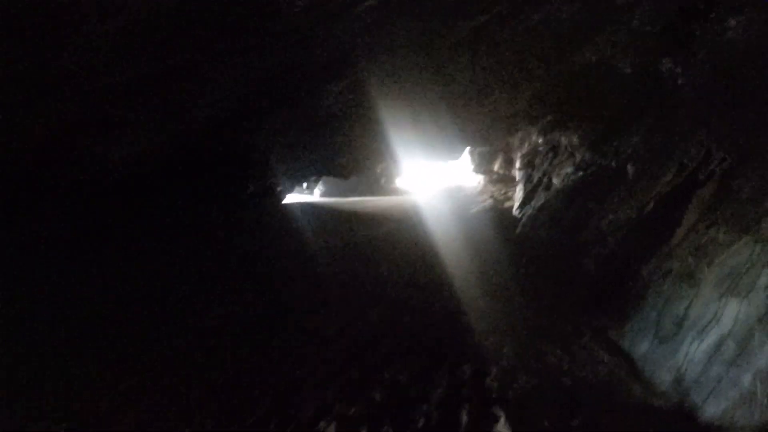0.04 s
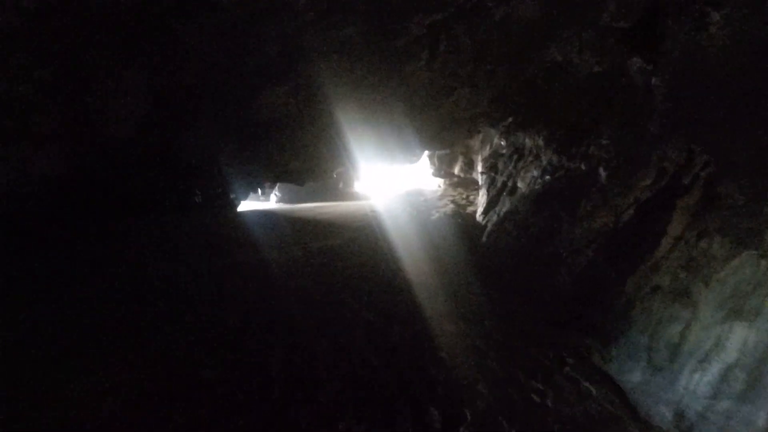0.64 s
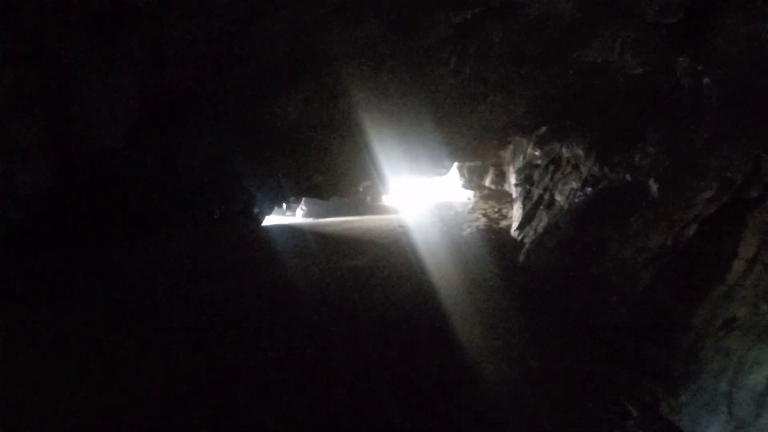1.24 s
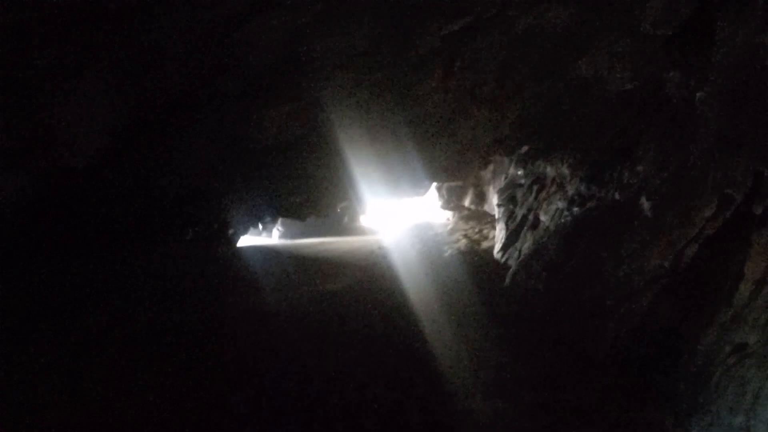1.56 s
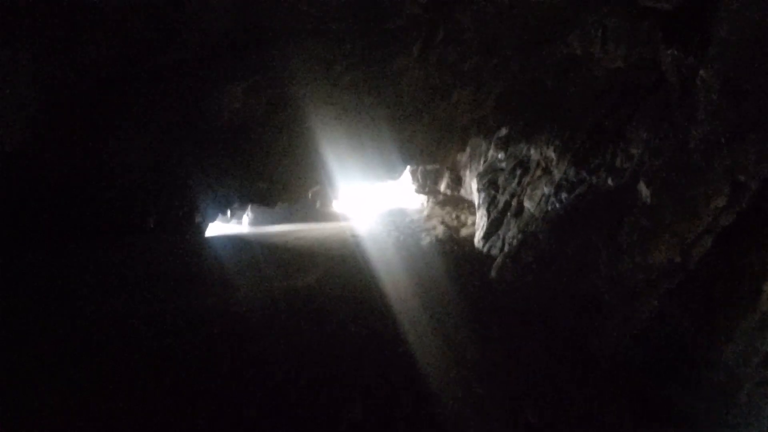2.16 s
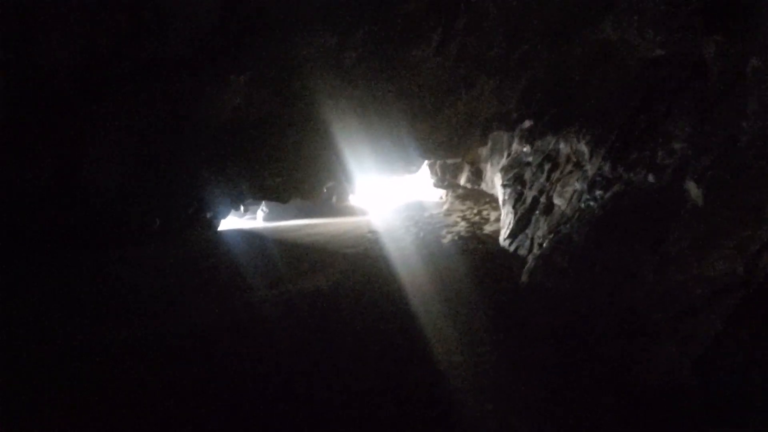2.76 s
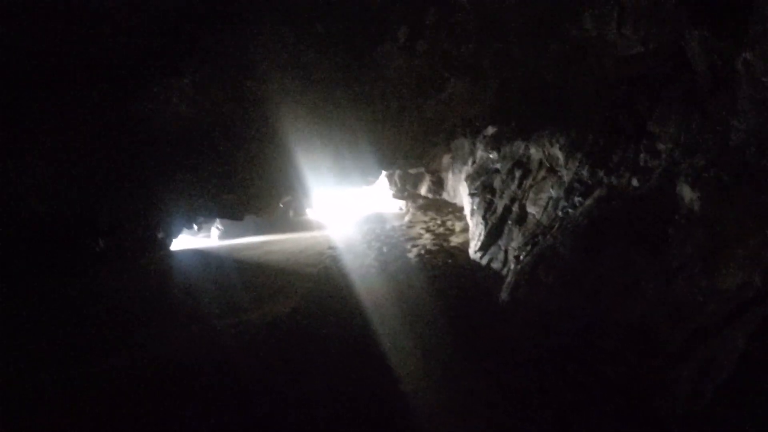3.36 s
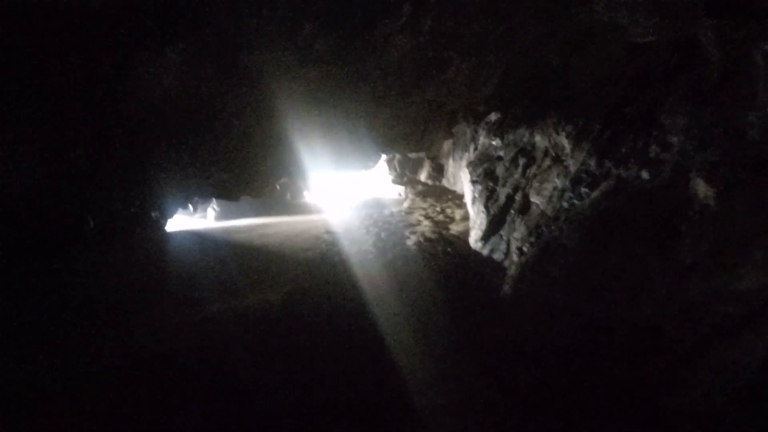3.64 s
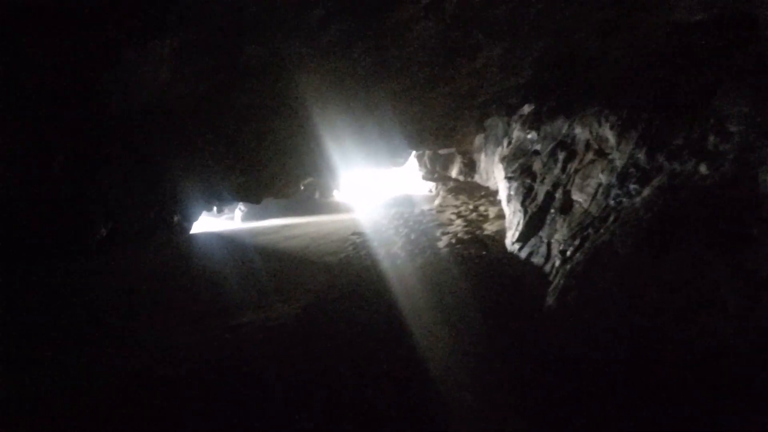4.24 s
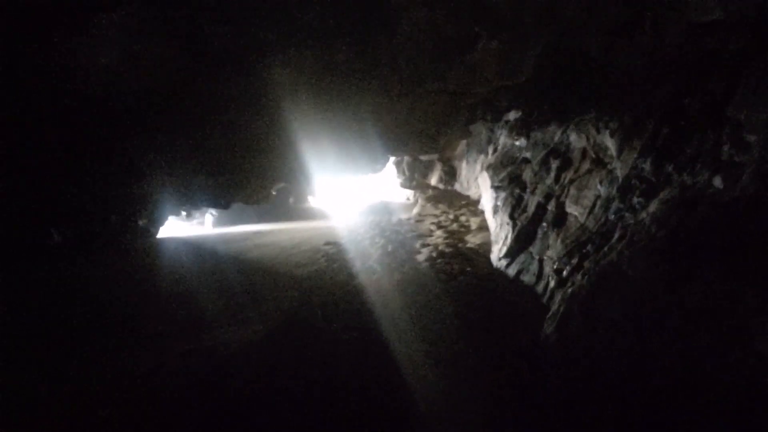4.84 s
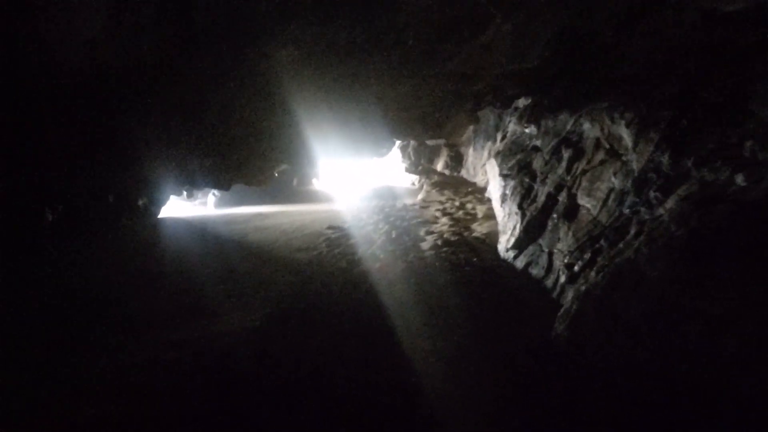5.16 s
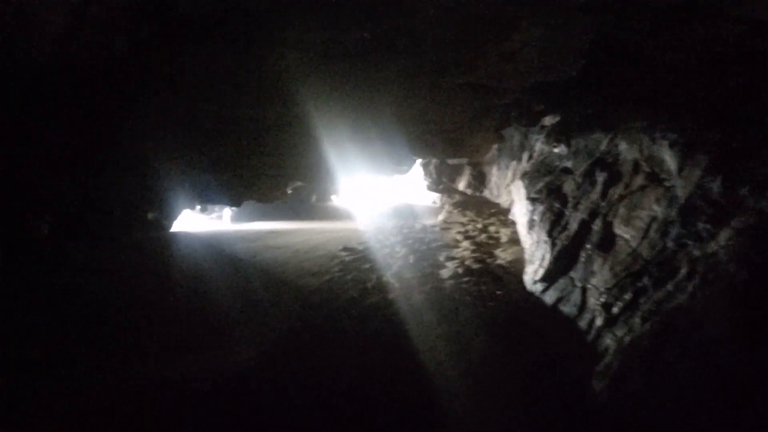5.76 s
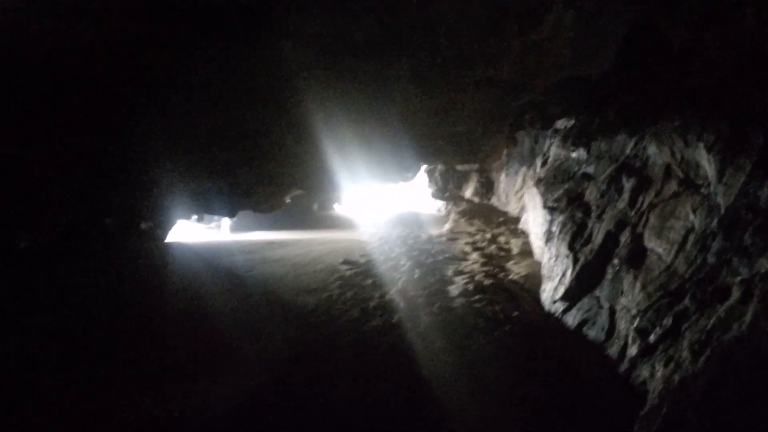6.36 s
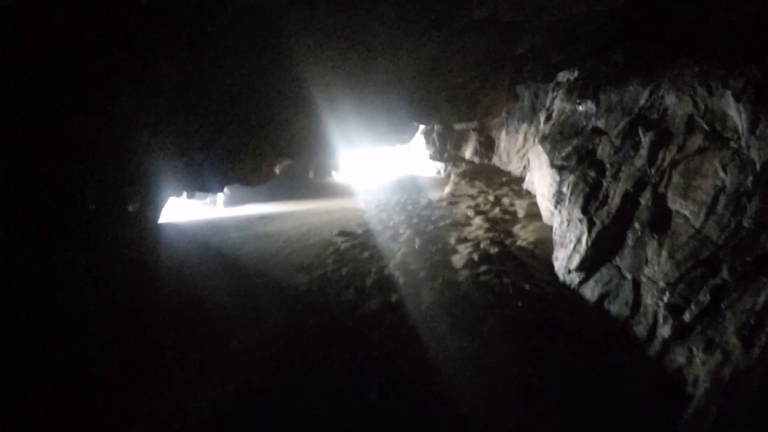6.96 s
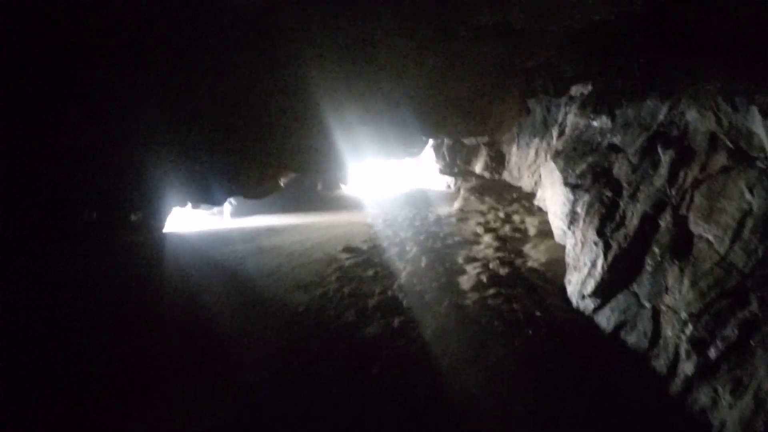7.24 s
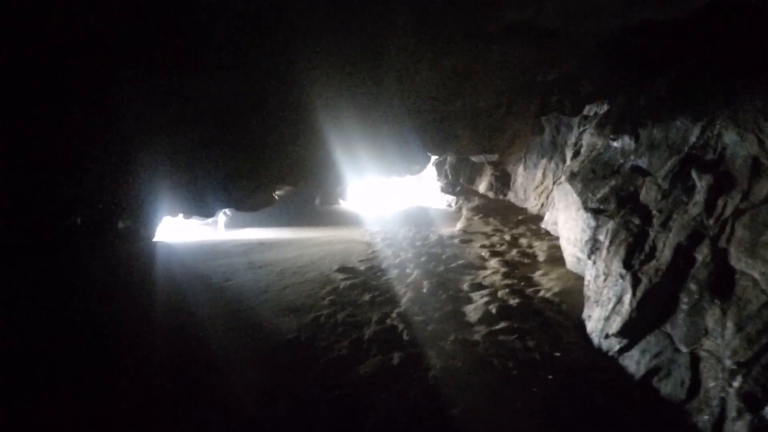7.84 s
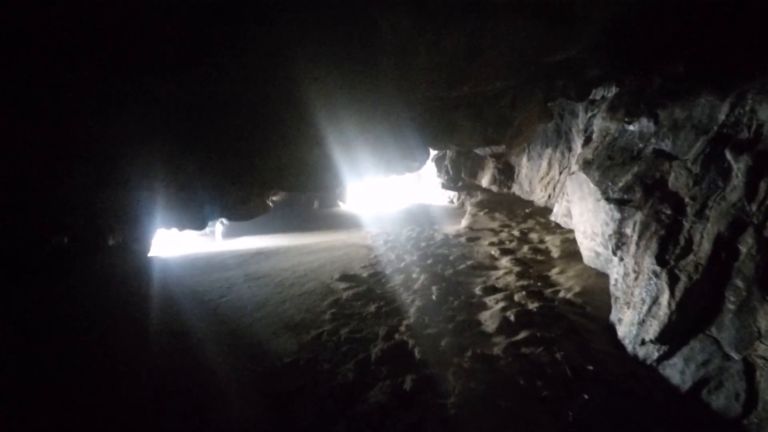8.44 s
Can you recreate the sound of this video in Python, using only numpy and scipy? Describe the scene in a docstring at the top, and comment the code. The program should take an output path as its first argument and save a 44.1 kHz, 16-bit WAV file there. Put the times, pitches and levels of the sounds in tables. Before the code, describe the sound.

Distant surf fills a rock cave throughout, a deep rumble under a steady, dull hiss. A very low boom rings from the outset and fades over the first few seconds. Right at the start, one dry tick of grit snaps close by with a short echo. The rumble heaves up by 0.5 seconds and holds. Breakers swell and die away with low booms at about 1.2 seconds and, strongest, at 2.6 seconds, then more weakly at 4.4 and 5.8 seconds. The bass drops back between 4.3 and 4.8 seconds, and the roar slowly ebbs until the end, near 8.7 seconds. Nearby, soft footsteps scrape faintly over sand during the first two seconds, with brief faint scuffs around 2.3, 3.1, 3.5, 5.4, 6 and 7.8 seconds. Two tiny high drips ping almost together at about 4.9 seconds. The steps and drips echo lightly off the walls.

```python
"""Distant surf in a rock cave.

A long set of waves rumbles in through the mouth, booms in two low modes of the cave and ebbs.
The rock smears its wash into a steady hiss. Close by, someone steps softly over sand,
with a few faint scuffs, one dry tick of grit and two tiny drips."""
import sys
import numpy as np
from scipy import signal
from scipy.fft import rfft, irfft
from scipy.io import wavfile

SR = 44100
rng = np.random.default_rng(int(sys.argv[2]) if len(sys.argv) > 2 else 0)


def generate_wav(sig):
    """Save sig (samples, or channels by samples) to the path in sys.argv[1] as 16-bit PCM at SR."""
    pcm = np.round(np.clip(np.atleast_2d(sig).T, -1, 1) * 32767).astype(np.int16)
    wavfile.write(sys.argv[1], SR, pcm)


N = 375291
TIME = np.arange(N) / SR
FREQS = np.maximum(np.arange(N // 2 + 1) * SR / N, 1)


# EQ curve of the surf's low end: f/Hz, level/dB
RUMBLE_EQ = [(8, -17), (16, -3), (28, 2), (48, -1), (75, -3), (100, -7.5), (140, -22), (400, -69),
             (2000, -100)]

def surf_rumble(start_s=.05, attack_s=.47, end_s=4.32, release_s=.45, set_db=-33.5, calm_db=-40.5):
    """The bass heaves up, holds while the set of waves lasts and drops back to the calm sea."""
    attack = (TIME - start_s) / attack_s
    release = 1 - (TIME - end_s) / release_s
    envelope = np.clip(np.minimum(attack, release), 0, 1)
    return churn(RUMBLE_EQ, rate_hz=7.3, depth_db=1.1) * undb(calm_db + (set_db - calm_db) * envelope)


# Heavy breakers at their peaks: t/s, level/dB
BREAKER_HITS = [(1.24, -37), (2.58, -33), (4.35, -39.5), (5.75, -41.5)]

def breaker_envelope(reference_db=-35, doubling_db=5.5):
    """The force of the breakers: each swells and dies away, the heavier the slower."""
    power = 0
    for peak_s, db in BREAKER_HITS:
        stretch = 2 ** ((db - reference_db) / doubling_db)
        db_per_s = 30 / stretch
        power += (undb(db) * swell(peak_s, db_per_s, db_per_s)) ** 2
    return np.sqrt(power)


# EQ curve of the roar, the body above the bass: f/Hz, level/dB
ROAR_EQ = [(50, -18), (85, -8), (110, -1.5), (145, -1.5), (200, -5.5), (290, -10), (380, -14.5),
           (520, -23.5), (1000, -40), (4000, -100)]

def surf_roar(breakers, crest_db=-36.5, breaker_send_db=-5):
    """Tumbling water builds slowly to one crest and ebbs; each breaker adds a push."""
    bed = undb(crest_db) * swell(peak_s=2.64, rise_db_per_s=.64, fall_db_per_s=1.35)
    envelope = np.hypot(bed, undb(breaker_send_db) * breakers)
    return churn(ROAR_EQ, rate_hz=6.7, depth_db=1.24) * envelope


def cave_boom(envelope, hz, width_hz):
    """One low mode of the cave, kept ringing by the surf: a narrow band of noise."""
    resonance = 1 / (1 + 2j * (FREQS - hz) / width_hz) ** 2
    return unit_rms(irfft(rfft(rng.standard_normal(N)) * resonance, N)) * envelope


def deep_boom(start_db=-31.5, fade_db_per_s=6.5, throb_db=.6):
    """The cave's deepest mode rings from the outset, throbs unevenly and fades."""
    envelope = undb(start_db - fade_db_per_s * TIME + throb_db * wobble(rate_hz=11))
    return cave_boom(envelope, hz=69.4, width_hz=12)


# EQ curve of the wash, full in the mids with a dull top: f/Hz, level/dB
WASH_EQ = [(60, -40), (150, 1), (400, 0.83), (620, 0.33), (1000, -5), (1900, -11.5), (2900, -14),
           (4200, -18), (5500, -22.6), (7500, -29), (10000, -33), (15000, -39)]

def shore_wash(level_db=-48, lift_db=1.4, settle_s=1.16):
    """Far-off broken water blurs into an even hiss that settles from a slightly louder start."""
    envelope = undb(level_db + lift_db * np.exp(-TIME / settle_s))
    return churn(WASH_EQ, rate_hz=2.4, depth_db=.57) * envelope


# Soles on sand: peak t/s, half-width t/s, scrape level/dB, hiss level/dB, hiss centre f/Hz
FOOT_SCUFFS = [(.58, 0.51, -65.5, -74, 12000), (1.6, 0.96, -67, -91, 11500),
               (2.335, 0.041, -56, -71, 12000), (3.13, 0.028, -66, -67, 10500),
               (3.55, 0.22, -66, -73, 8800), (5.427, .05, -60.5, -75, 11500), (5.98, .03, -62, -79, 11500),
               (7.8, .03, -63, -77, 11500)]
# EQ curve of the gritty scrape: f/Hz, level/dB
SCRAPE_EQ = [(500, -9), (1500, 2), (3200, -0.5), (4500, 4), (6000, -12.5), (9000, -24), (15000, -30)]
# EQ curve of the airy sand hiss: f/hiss centre, level/dB
SAND_EQ = [(.26, -14), (.52, 1), (.78, -4), (1, 0), (1.25, -5), (2, -22)]

def sand_scuffs(grain_db=2.4):
    """A sole presses, slides and lifts: uneven grains scrape and sand hisses, the finer the higher."""
    noise = rng.standard_normal((2, N))
    crunch = undb(grain_db * np.minimum(rng.exponential(size=(2, N)), 5))
    scrape_grains, hiss_grains = noise * crunch
    scrape = equalise(scrape_grains, SCRAPE_EQ)
    steps = 0
    for peak_s, half_width_s, scrape_db, hiss_db, hiss_hz in FOOT_SCUFFS:
        hiss = equalise(hiss_grains, [(ratio * hiss_hz, db) for ratio, db in SAND_EQ])
        pressure = np.exp(-((TIME - peak_s) / half_width_s) ** 2)
        steps += pressure * (undb(scrape_db) * scrape + undb(hiss_db) * hiss)
    return steps


# Grit snapping underfoot: t/s, level/dB
GRIT_HITS = [(.125, -31)]
# Partials of the snap: f/Hz, t60/s, relative level/dB
GRIT_PARTIALS = [(1900, .003, -3), (3600, .002, -3), (5300, .002, -1)]

def grit_tick(cutoff_hz=6400):
    """A bit of grit snaps and dies within milliseconds; the sole over it muffles the top."""
    snap = sum(undb(hit_db + partial_db) * ping(start_s, hz, t60)
               for start_s, hit_db in GRIT_HITS for hz, t60, partial_db in GRIT_PARTIALS)
    return signal.sosfilt(signal.butter(8, cutoff_hz, fs=SR, output="sos"), snap)


# Drops landing: t/s, f/Hz, level/dB, t60/s
DRIP_HITS = [(4.844, 5130, -56, 0.053), (4.875, 8780, -69.5, .2)]

def drips():
    """Falling water lands in tiny high pings."""
    return sum(undb(db) * ping(start_s, hz, t60) for start_s, hz, db, t60 in DRIP_HITS)


def cave_reverb(x, t60, wet_db):
    """Direct sound plus a diffuse tail from the rock walls."""
    tail = rng.standard_normal(N) * np.exp(-np.log(1000) * TIME / t60)
    return x + undb(wet_db) * signal.fftconvolve(x, tail / np.linalg.norm(tail))[:N]


def churn(curve, rate_hz, depth_db):
    """Turbulence: shaped noise whose ten octave bands each rise and fall on their own."""
    spectrum = rfft(equalise(rng.standard_normal(N), curve))
    octave = np.clip(np.log2(FREQS / 30), 0, 9)
    bands = (irfft(spectrum * np.maximum(1 - abs(octave - k), 0), N) for k in range(10))
    return unit_rms(sum(band * undb(depth_db * wobble(rate_hz)) for band in bands))


def equalise(x, curve):
    """Filter by an EQ curve of (f/Hz, level/dB) points; rms 1."""
    hz, db = np.transpose(curve)
    gain = undb(np.interp(np.log(FREQS), np.log(hz), db))
    return unit_rms(irfft(rfft(x) * gain, N))


def wobble(rate_hz):
    """Smooth random modulation that rolls off around rate_hz; rms 1."""
    lowpass = np.exp(-(FREQS / rate_hz) ** 2 / 2)
    return unit_rms(irfft(rfft(rng.standard_normal(N)) * lowpass, N))


def swell(peak_s, rise_db_per_s, fall_db_per_s):
    """A fade up to unity gain and down again, each straight in dB."""
    return undb(-np.maximum((peak_s - TIME) * rise_db_per_s, (TIME - peak_s) * fall_db_per_s))


def ping(start_s, hz, t60):
    """A struck mode: a decaying sine."""
    age = np.maximum(TIME - start_s, 0)
    return np.sin(2 * np.pi * hz * age) * np.exp(-np.minimum(np.log(1000) * age / t60, 20))


def undb(db):
    """Decibels to gain."""
    return 10 ** (np.asarray(db) / 20)


def unit_rms(x):
    """Scale to rms 1."""
    return x / np.sqrt(np.mean(x ** 2))


def scene():
    """Mono mix: surf fills the cave, breakers ring its upper mode, steps and drips echo off the walls."""
    breakers = breaker_envelope()
    surf = surf_rumble() + surf_roar(breakers) + shore_wash()
    booms = deep_boom() + cave_boom(breakers, hz=105.4, width_hz=12.8)
    steps = cave_reverb(sand_scuffs() + grit_tick(), t60=1.0, wet_db=-7.5)
    drops = cave_reverb(drips(), t60=.5, wet_db=-3)
    return (surf + booms + steps + drops)[None]


def record(dry, fade_s=.005, cutoff_hz=15250):
    """A quick fade at each end and a steep high cut."""
    fades = np.minimum(np.minimum(TIME, TIME[::-1]) / fade_s, 1)
    high_cut = signal.ellip(12, .1, 90, cutoff_hz, fs=SR, output="sos")
    return signal.sosfilt(high_cut, dry * fades)


dry = scene()
out = record(dry)
generate_wav(out)
```